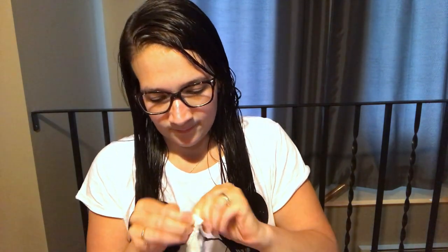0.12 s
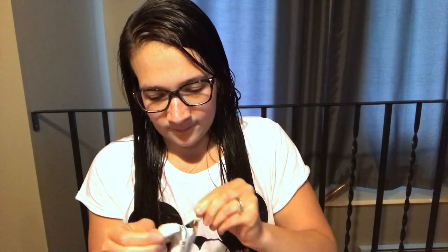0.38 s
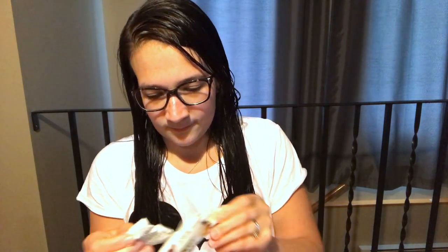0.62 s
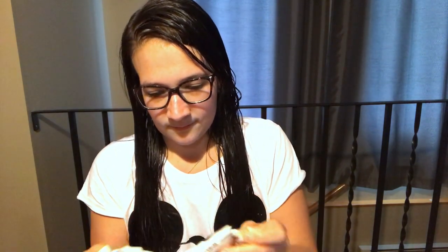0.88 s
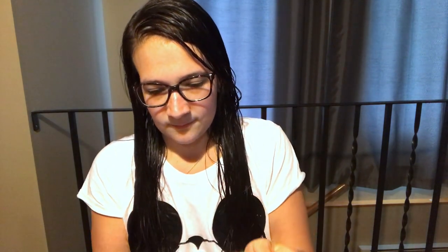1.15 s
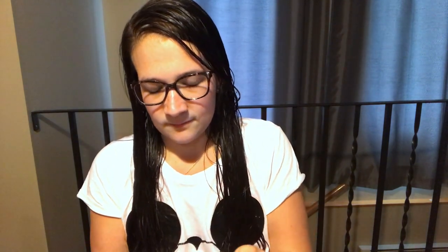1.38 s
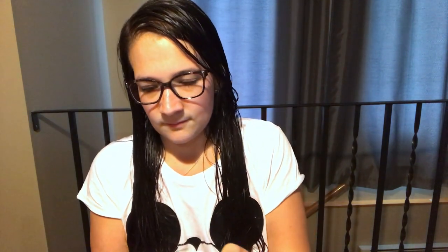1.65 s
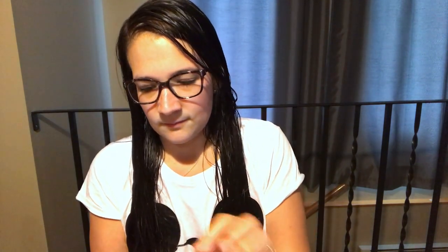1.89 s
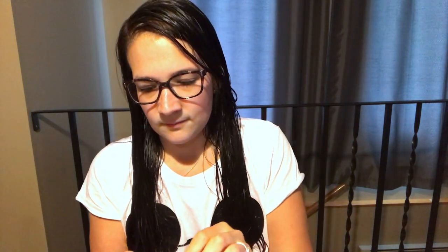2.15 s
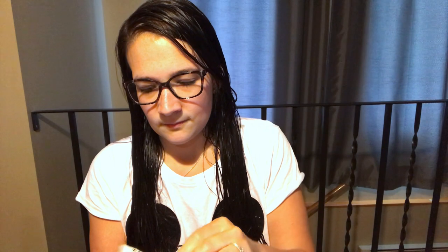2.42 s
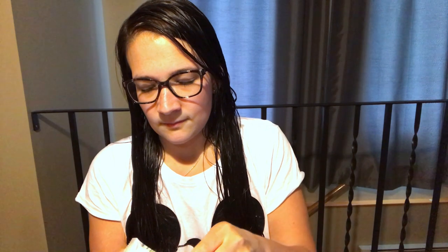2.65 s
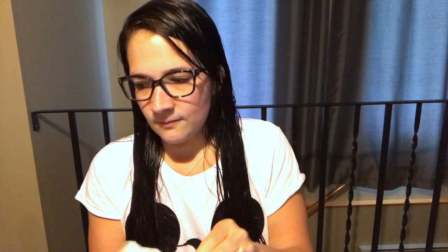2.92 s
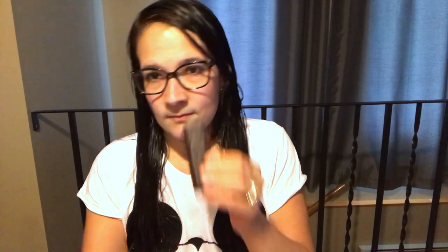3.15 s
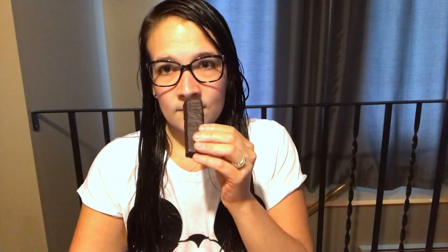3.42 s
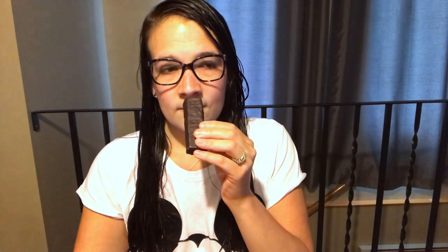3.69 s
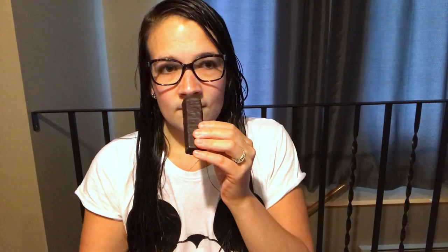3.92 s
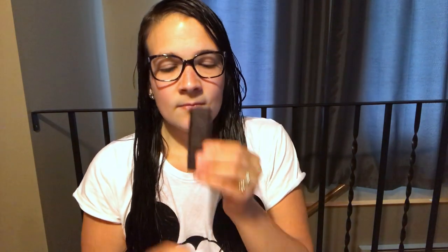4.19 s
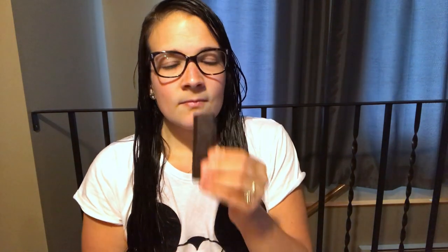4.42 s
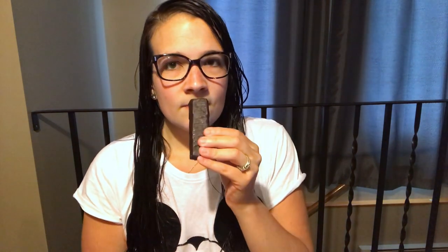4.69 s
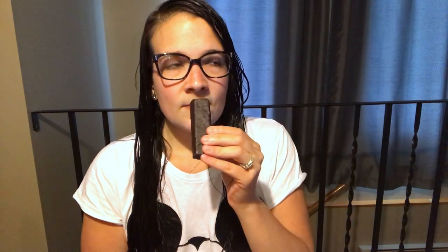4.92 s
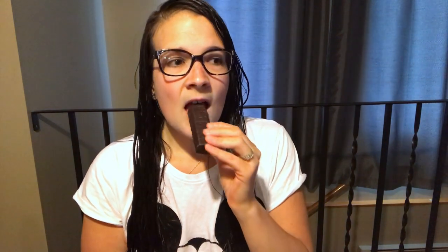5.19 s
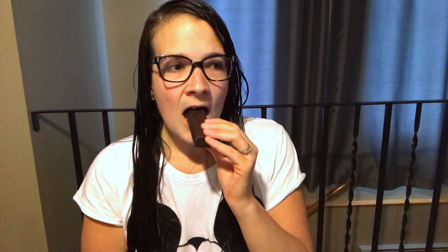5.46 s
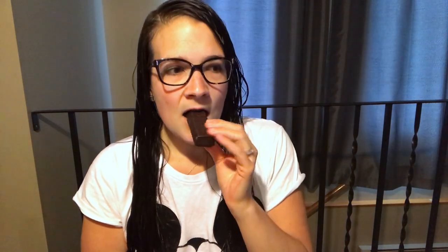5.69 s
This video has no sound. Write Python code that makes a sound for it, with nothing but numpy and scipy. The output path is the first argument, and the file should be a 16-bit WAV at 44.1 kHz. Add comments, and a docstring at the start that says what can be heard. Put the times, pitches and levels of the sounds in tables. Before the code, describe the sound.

A snack wrapper crackles briskly: loud bursts and quick seam rips in the first second, scattered drier crinkles after, another busy cluster just before three seconds, and a final sharp snap. It is dropped; a single click follows about a second later, then very faint ticks. Indoor room with short reflections, close modest microphone, quiet household rumble and soft hiss.

```python
"""Quiet room, small microphone close by: two hands tear a thin plastic wrapper open and crumple it.
Each buckling crease gives a snap of coloured noise a few ms long; countless smaller ones make the rustle.
The seam rips in quick slips, and the pouch pops softly as damped low tones.
The dropped wrapper clicks once more as it relaxes, then ticks faintly, over shaped-noise rumble and hiss."""
import sys
import numpy as np
from scipy import signal
from scipy.fft import rfft, irfft
from scipy.io import wavfile
from scipy.ndimage import uniform_filter1d

SR = 44100
rng = np.random.default_rng(int(sys.argv[2]) if len(sys.argv) > 2 else 0)


def gain_from_decibels(decibels):
    """Convert decibel values to linear amplitude factors."""
    exponent = np.asarray(decibels, float) / 20
    return 10 ** exponent


def store_wav(level_fs):
    """Save 16-bit WAV to argv[1]."""
    pcm = np.round(np.clip(np.atleast_2d(level_fs), -1, 1) * 32767)
    wavfile.write(sys.argv[1], SR, pcm.T.astype(np.int16))


N = 256838

# how hard the hands work the wrapper: (time [s], rustle level [dB])
HANDLING = [(0.0, -59), (0.091, -61), (0.127, -35.5), (0.222, -29.5), (0.322, -47), (0.436, -46),
            (0.644, -32.5), (0.707, -46.5), (0.76, -65.5), (0.887, -39.5), (1.036, -48.5), (1.167, -35),
            (1.24, -52), (1.421, -41), (1.51, -51), (1.613, -37), (1.706, -49), (1.81, -51.5), (1.9, -67.5),
            (1.985, -54), (2.06, -66), (2.12, -52), (2.39, -51), (2.469, -47), (2.6, -46), (2.723, -45.5),
            (2.862, -52), (2.95, -42), (3.04, -69.5), (3.198, -46), (3.34, -52.5), (3.375, -43.5),
            (3.449, -64)]
# colour of crumpled film: (frequency [Hz], relative density [dB per Hz])
FILM_COLOUR = [(88, -44.5), (150, -8), (683, -13.5), (767, -13.5), (1320, -8), (2770, -6), (3230, -8.5),
               (3780, -5), (6140, -6), (13400, -14.5), (15600, -14)]
SNAP_T60_S = 0.011  # typical; small panels ring shorter, large ones longer


def evened(x):
    """Scales to rms 1."""
    return x / np.sqrt(np.mean(x ** 2, axis=-1, keepdims=True) + 1e-20)


def read(points, hz):
    """Reads a table on a log-frequency axis."""
    f, value = np.transpose(points)
    return np.interp(np.log(hz + 1), np.log(f + 1), value)


def bump(hz, centre_hz, octaves):
    """A rounded peak on a log-frequency axis, top 1."""
    return np.exp(-.5 * (np.log2((hz + 1) / centre_hz) / octaves) ** 2)


def bursts(colour_db, t60_s, rise_s):
    """One sharp crack, then dying coloured noise, a row; energy of 2 ms at rms 1; thin film radiates no bass."""
    t, spectrum = np.arange(1024) / SR, gain_from_decibels(colour_db)
    noise = rng.standard_normal((len(colour_db), 1024))
    ring = evened(irfft(rfft(noise) * spectrum))
    ring = ring * (1 - np.exp(-t / rise_s)) * gain_from_decibels(-60 * t / t60_s)
    crack = np.roll(irfft(spectrum * 1j), 12, axis=1) * (t < .0006)
    crack = crack / abs(crack).max(axis=1, keepdims=True)
    shaped = signal.lfilter(*signal.butter(2, 420, "high", fs=SR), ring + 0.64 * crack)
    return shaped / np.linalg.norm(shaped, axis=1, keepdims=True) * np.sqrt(.002 * SR)


def placed(times_s, sounds):
    """Lays one sound a row on the time line, overlaps adding."""
    out = np.zeros(N + sounds.shape[1])
    first = np.round(times_s * SR).astype(int)[:, None]
    np.add.at(out, first + np.arange(sounds.shape[1]), sounds)
    return out[:N]


def quiet():
    """Low rumble of the house and hiss: shaped noise, gently patchy in time and frequency."""
    # (frequency [Hz], relative density [dB per Hz])
    floor_colour = [(15, -25), (25, -11), (86, -3), (140, -3), (174, -11), (434, -18.5), (471, -22),
                    (633, -20), (686, -22.5), (1420, -24.5), (3640, -31), (15600, -40.5)]
    level_db = -59.5  # rms
    hz = np.fft.rfftfreq(2048, 1 / SR)
    real, imag, patches = rng.standard_normal((N // 512 + 5, 1025, 3)).T
    patches = uniform_filter1d(patches, size=24, axis=0)
    patches = uniform_filter1d(patches, size=8, axis=1)
    colour_db = read(floor_colour, hz)[:, None] + patches / patches.std()
    z = (real + 1j * imag) * gain_from_decibels(colour_db)
    noise = signal.istft(z, nperseg=2048, noverlap=1536)[1][:N]
    return gain_from_decibels(level_db) * evened(noise)


def rustle():
    """Many small creases of uneven size; large panels thud low and long, and the busy panels keep changing."""
    creases_per_s = 700
    s, level_db = np.transpose(HANDLING)
    t, hz = np.arange(N) / SR, np.fft.rfftfreq(1024, 1 / SR)
    pitch_hz = np.geomspace(400, 11000, 24)[:, None]
    colour_db = read(FILM_COLOUR, hz) + 10 * bump(hz, pitch_hz, 0.51)
    kinds = evened(bursts(colour_db, SNAP_T60_S * (3000 / pitch_hz) ** 0.5, 0.00054))
    size = gain_from_decibels(2.94 * np.minimum(rng.exponential(1, N), 4))
    size *= rng.random(N) < creases_per_s / SR
    kind = rng.integers(0, len(kinds), N)
    # each block of 2048 samples favours other panels, neighbours in pitch alike
    busy = uniform_filter1d(rng.standard_normal((N // 2048 + 2, len(kinds))), size=3, axis=1)
    size *= gain_from_decibels(3.2 * evened(busy)[np.arange(N) // 2048, kind])
    crackle = sum(signal.oaconvolve(size * (kind == k), kinds[k])[:N] for k in range(len(kinds)))
    return evened(crackle) * gain_from_decibels(np.interp(t, s, level_db, right=-120))


def film(hz, edges_hz):
    """Colour of the film with each band scaled to the same power."""
    band, power = np.digitize(hz, edges_hz), gain_from_decibels(2 * read(FILM_COLOUR, hz))
    return 10 * np.log10(power / np.bincount(band, power)[band])


def lesser(count=45):
    """Rows like those of the loud snaps, drawn by chance; the harder the handling, the stronger."""
    firm_rustle_db, firm_snap_db, snap_db_per_rustle_db = -39.5, -29, 1.34
    level_spread_db, colour_spread_db = 3, 8.5
    low_hz, high_hz = 1300, 9000
    s, level_db = np.transpose(HANDLING)
    when, pitch = rng.random((count, 2)).T
    size, body, treble = rng.standard_normal((count, 3)).T
    at_s = s[-1] * (np.arange(count) + when) / count
    grip_db = np.interp(at_s, s, level_db) - firm_rustle_db
    db = firm_snap_db + snap_db_per_rustle_db * grip_db + level_spread_db * size
    pitch_hz = low_hz * (high_hz / low_hz) ** pitch
    return np.transpose([at_s, db, pitch_hz, colour_spread_db * body - 13.5, colour_spread_db * treble - 9.5])


def snaps():
    """Each crease flips over at once and rings the panel beside it; returns near sound and what the walls get."""
    # loudest creases, and lone ones in the pauses: (time [s], level [dB], panel pitch [Hz],
    # body under 2 kHz [dB re middle], treble from an octave over the pitch, 4.8-8 kHz [dB re middle])
    loud_creases = [(0.041, -35, 3840, -6, -3), (0.0698, -35, 4040, -15, -2),
                    (0.1123, -22.5, 6470, -11.5, 4), (0.135, -21, 4930, -1, -19),
                    (0.1469, -21, 3730, -15.5, -2.5), (0.1515, -22, 5700, -9, -3),
                    (0.174, -23.5, 5140, -13.5, 10), (0.1798, -22, 3900, -15, -21.5),
                    (0.2051, -19.5, 4100, -12, 10), (0.2136, -23, 3520, -1, 3.5),
                    (0.233, -25.5, 8000, -2.5, -5), (0.2643, -26.5, 5580, 6, 0),
                    (0.3432, -20.5, 5940, -36.5, -6), (0.363, -27, 1610, -3, -1.5),
                    (0.4619, -20, 2850, 4.5, 0.5), (0.4871, -16, 2670, -5.5, -1),
                    (0.5126, -24, 6200, -17, -9), (0.527, -21.5, 5800, -11, 3.5),
                    (0.5524, -22.5, 3950, -5, 1.5), (0.5584, -20.5, 3740, -4, -4),
                    (0.6142, -16.5, 4700, 5.5, 8.5), (0.8247, -31.5, 4850, 3, -5.5),
                    (0.8638, -31.5, 1290, 0, -13), (0.8845, -27.5, 1300, 4, -14.5),
                    (0.898, -23, 7400, -9, 0), (0.911, -29, 6660, 3.5, -16), (0.946, -26.5, 6900, -10, 3.5),
                    (0.9566, -27, 1220, 2.5, 4), (0.994, -28, 1300, 0, -1.5), (1.076, -31.5, 4770, 3, -8),
                    (1.1142, -35, 5130, -2.5, -11), (1.1642, -27.5, 1772, 1, 0),
                    (1.1715, -26.5, 6700, 4, -7), (1.1789, -26, 2000, 4, 6.5), (1.1896, -29, 2020, 1, -2),
                    (1.2279, -28, 4450, 3.5, 0.5), (1.2392, -23, 5940, 0.5, 6),
                    (1.4001, -33.5, 3250, -20, -10), (1.497, -37, 1300, -10, -12),
                    (1.527, -31, 4500, 0.5, -23.5), (1.5548, -28, 6640, -14, -18),
                    (1.6856, -32, 3970, -24, 2), (1.7194, -22, 6140, 1.5, 2),
                    (1.775, -30.5, 2480, -3, -7.5), (1.7905, -23.5, 6240, -9, -21),
                    (1.7978, -22.5, 2520, -3, -4), (1.8586, -35, 4030, -16, -7),
                    (1.8955, -43, 6900, -32, 12.5), (2.0977, -34.5, 3320, -3, -26),
                    (2.1599, -21.5, 6830, -1, -1), (2.1887, -25, 6400, -9, -31),
                    (2.313, -25, 1550, -3.5, -1.5), (2.3392, -19.5, 9500, -28, -0.5),
                    (2.3531, -33, 6630, -11, -13), (2.6593, -19, 6200, -13.5, -4.5),
                    (2.672, -21, 3100, -10, 1), (2.7, -18, 3650, -4.5, -1.5),
                    (2.7125, -20.5, 6460, -9, -16), (2.7327, -22.5, 2950, -7, 3),
                    (2.7443, -23.5, 4130, -21, 5), (2.7712, -28.5, 2860, -14, -19.5),
                    (2.8613, -33, 1820, -17, -3.5), (2.9106, -28.5, 1400, -5.5, 1),
                    (2.9355, -20.5, 3020, -2.5, -10), (2.9578, -29, 5450, 7, -2.5),
                    (3.1091, -32.5, 2250, 4.5, 1), (3.1443, -36, 2414, -1.8, -9),
                    (3.1603, -27, 5560, -7, -2.5), (3.1959, -28.5, 4100, -0.5, -0.5),
                    (3.359, -25, 4430, 0.5, -3), (3.3641, -22.5, 2480, 1.5, -2),
                    (3.4054, -15, 2450, -4.5, -11), (4.4041, -26.5, 6300, -2.5, -5)]
    s, db, pitch_hz, body_db, treble_db = np.vstack([loud_creases, lesser()]).T[:, :, None]
    hz = np.fft.rfftfreq(1024, 1 / SR)
    treble_from_hz = np.clip(2 * pitch_hz, 4800, 8000)
    bands_db = film(hz, [2000, 8000]) + body_db * (hz < 2000) + treble_db * (hz >= treble_from_hz)
    colour_db = uniform_filter1d(bands_db, size=31, axis=1) + 5 * bump(hz, pitch_hz, 0.88)
    t60_s = SNAP_T60_S * gain_from_decibels(0.83 * rng.standard_normal((len(s), 1)))
    near = gain_from_decibels(db) * bursts(colour_db + 7 * bump(hz, pitch_hz, 0.13), t60_s, 0.00012)
    # summed over all directions the dips of a snap even out: a smooth click of the same energy
    smooth = np.roll(irfft(gain_from_decibels(colour_db + 1.9 * bump(hz, pitch_hz, 0.1))), 64, axis=1)
    smooth *= np.linalg.norm(near, axis=1, keepdims=True) / np.linalg.norm(smooth, axis=1, keepdims=True)
    return placed(s[:, 0], near), placed(s[:, 0], smooth)


def rips():
    """A tearing seam sticks and slips at an uneven, quick pace, each slip a burst of film noise."""
    # (start [s], end [s], slip rate [1/s], first level [dB], last level [dB], mid pitch [Hz])
    seam_tears = [(0.1, 0.115, 330, -31.5, -36, 2970), (0.22, 0.227, 500, -28, -31.5, 3000),
                  (0.631, 0.726, 165, -29, -33.5, 4700), (1.292, 1.307, 340, -30.5, -38, 2600)]
    hz, out = np.fft.rfftfreq(1024, 1 / SR), np.zeros(N)
    for start, end, rate, first_db, last_db, seam_hz in seam_tears:
        step, size, pitch = rng.standard_normal((40, 3)).T
        s = start + (np.arange(40) + 0.22 * step) / rate
        # slips past the end are silenced
        db = np.interp(s, [start, end], [first_db, last_db], right=-150) + 0.83 * size
        slip_hz = seam_hz * gain_from_decibels(2.5 * pitch[:, None])
        colour_db = read(FILM_COLOUR, hz) + 6 * bump(hz, slip_hz, 0.17)
        out += placed(s, gain_from_decibels(db)[:, None] * bursts(colour_db, SNAP_T60_S, 0.00036))
    return out


def pops():
    """The pouch's air pocket pops as a wall caves in: a soft-edged, quickly damped low tone."""
    # (time [s], level [dB, about the envelope peak], pitch [Hz])
    cave_ins = [(0.1, -39, 367), (0.148, -39, 590), (0.229, -31.5, 663), (0.486, -50, 400),
                (0.56, -40.5, 440), (0.611, -44, 495), (0.945, -42, 620), (1.164, -40, 548),
                (1.796, -41, 575), (2.941, -46.5, 302), (3.402, -41, 627), (4.404, -51.5, 350)]
    s, db, pitch_hz = np.transpose(cave_ins)[:, :, None]
    t = np.arange(2048) / SR
    swell = t / 0.0036 * np.exp(1 - t / 0.0034)
    return placed(s[:, 0], gain_from_decibels(db) * swell * np.sin(2 * np.pi * pitch_hz * t))


def ticks():
    """Faint clicks in the quiet afterwards: noise bursts peaked round one pitch."""
    # (time [s], level [dB], pitch [Hz], width [octaves])
    faint_clicks = [(4.984, -60, 12600, 0.68), (5.075, -43, 3250, 1.7), (5.2, -58, 1560, 0.36),
                    (5.259, -60, 1650, 0.3), (5.271, -58.5, 5100, 0.91), (5.522, -61, 1500, 0.23),
                    (5.554, -52.5, 1450, 0.15)]
    s, db, pitch_hz, octaves = np.transpose(faint_clicks)[:, :, None]
    hz = np.fft.rfftfreq(1024, 1 / SR)
    return placed(s[:, 0], gain_from_decibels(db) * bursts(36 * bump(hz, pitch_hz, octaves), 0.01, 0.00049))


def room(x):
    """Walls as three dense noise tails that take turns, so that like snaps do not echo alike."""
    # (frequency [Hz], t60 [s])
    wall_decay = [(300, 0.59), (1500, 0.31), (4200, 0.4), (6500, 0.33), (12000, 0.23)]
    hz, t, z = signal.stft(rng.standard_normal((3, SR // 2)), SR, nperseg=128)
    decay = gain_from_decibels(-60 * t / read(wall_decay, hz)[:, None])
    tails = signal.istft(z * decay, SR, nperseg=128)[1]
    tails = tails * np.clip(np.arange(tails.shape[1]) / SR / 0.0046, 0, 1)  # 4.6 ms fade-in
    turn_rad = np.arange(N) / SR * 9 + np.arange(3)[:, None] * np.pi / 3
    fed = x * np.sin(turn_rad) * np.sqrt(2 / 3)  # the three powers sum to that of x
    return signal.fftconvolve(fed, tails / np.linalg.norm(tails[0]), axes=1)[:, :N].sum(axis=0)


def scene():
    """The wrapper, its echo off the walls, and the quiet room."""
    near, smooth = snaps()
    ticks_near = ticks()
    small = rustle() + rips() + pops()
    echo = gain_from_decibels(-11) * room(smooth + small + gain_from_decibels(-5) * ticks_near)
    return (near + small + echo + ticks_near + quiet())[None]


def band_limit(x):
    """A steep low-pass at the top of the band."""
    return signal.sosfilt(signal.butter(12, 16990, fs=SR, output="sos"), x)


def record(dry):
    """Two dips of the microphone housing, nothing over 15.9 kHz; slow gain control lags the loud part."""
    hz = np.fft.rfftfreq(N, 1 / SR)
    housing_db = -4 * bump(hz, 4900, 0.051) - 4.6 * bump(hz, 10350, 0.04)
    heard = irfft(rfft(dry) * gain_from_decibels(housing_db) * (hz < 15900), N)
    recent = signal.oaconvolve(heard[0] ** 2, np.ones(28000) / 28000)[:N]  # mean power of the last 0.63 s
    over_db = np.clip(10 * np.log10(abs(recent) + 1e-12) + 52, 0, 6)
    reduction = gain_from_decibels(.5 * uniform_filter1d(over_db, size=4410))  # half the excess over -52 dB, 3 dB at most
    return band_limit(heard / reduction)


dry = scene()
out = record(dry)
store_wav(out)
```